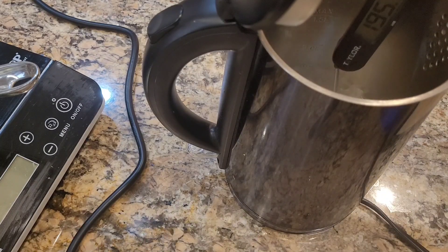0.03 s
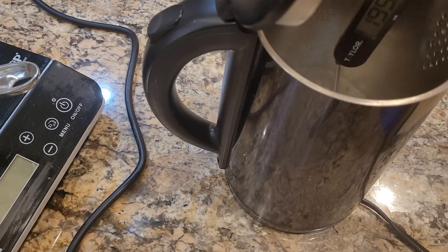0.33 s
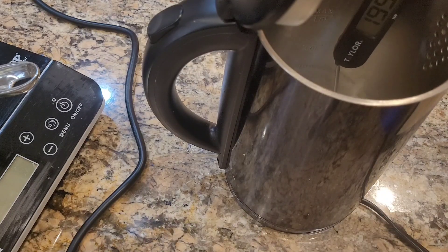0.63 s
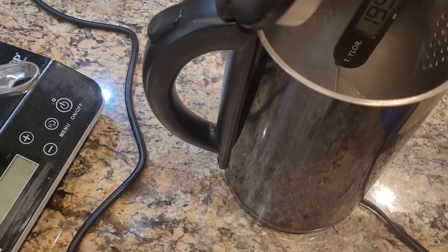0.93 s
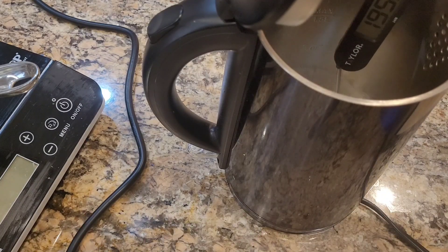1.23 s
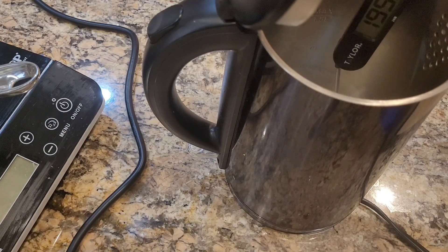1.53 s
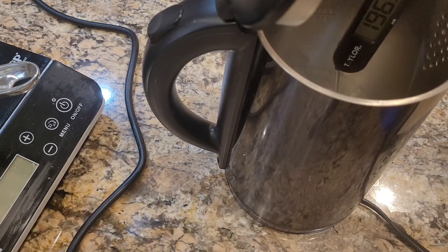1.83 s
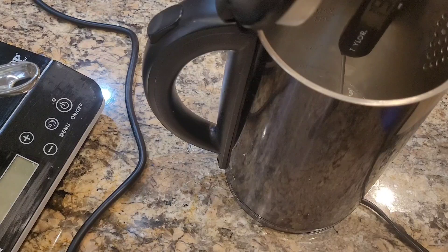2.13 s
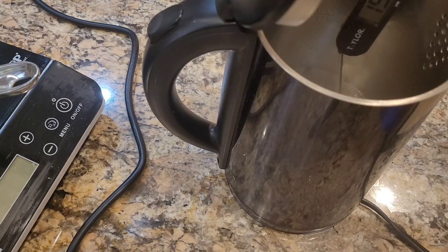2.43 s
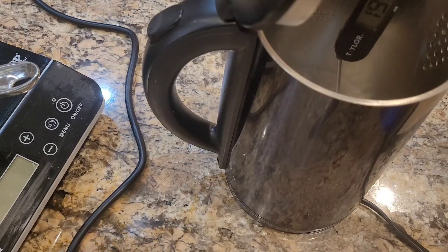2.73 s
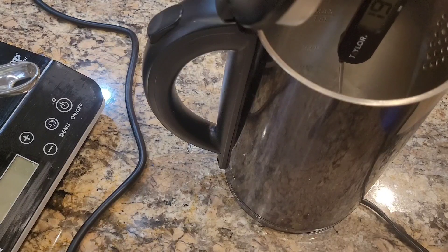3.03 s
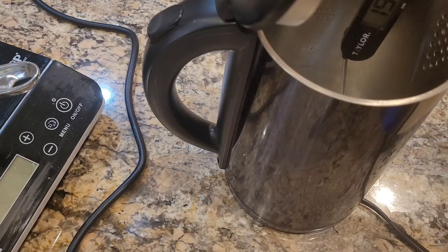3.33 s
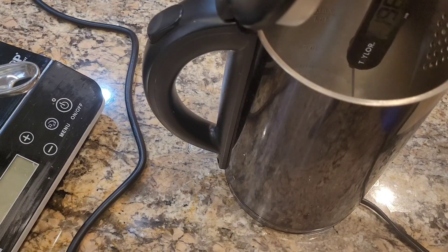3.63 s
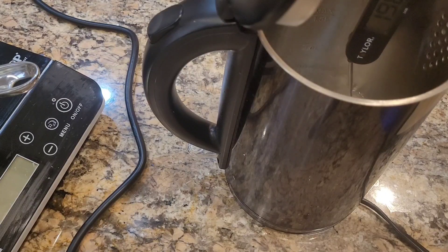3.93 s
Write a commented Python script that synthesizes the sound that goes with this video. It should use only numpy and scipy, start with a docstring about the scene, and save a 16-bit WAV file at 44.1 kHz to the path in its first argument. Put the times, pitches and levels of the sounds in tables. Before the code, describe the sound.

An electric kettle rumbles and hisses close by on a kitchen countertop, its water softly bubbling and ticking against the steel wall. A soft bump and puff of air hit the microphone early, and another puff follows later.

```python
"""A low rumble under a bright sizzle: an electric kettle on a stone countertop, shortly before the boil.
Steam bubbles collapse on the hot base; each impulse excites the modes of water and jug (the rumble)
and spits against the steel wall (the sizzle, which slowly fades as the water heats). Large bubbles
throb, tiny ones pop, and the steel pings. Twice a puff of air buffets the right microphone port,
the first time with a soft knock."""
import sys
import numpy as np
from scipy import signal
from scipy.fft import rfft, irfft
from scipy.io import wavfile

SR = 44100
rng = np.random.default_rng(int(sys.argv[2]) if len(sys.argv) > 2 else 0)


def file_out(sig):
    """Save sig as 16-bit WAV at sys.argv[1]."""
    # one column per channel
    cols = np.atleast_2d(sig).T
    # limit, then scale
    lim = np.clip(cols, -1, 1)
    pcm = np.round(lim * 32767).astype(np.int16)
    wavfile.write(sys.argv[1], SR, pcm)


N = 176400

# Large bubbles: (time [s], peak level [dB], pitch [Hz], offset of the thud in the jug [dB])
LARGE_BUBBLES = [(0.162, -41.5, 456, 1.5), (0.231, -45, 501, -4), (.303, -50, 486, -3),
                 (0.358, -39, 479, -16), (.388, -44, 473, -20), (0.452, -35, 478, -5),
                 (.558, -43, 458, 5.5), (.614, -40.5, 454, -15), (.643, -54, 483, -2),
                 (0.708, -39.5, 481, -15), (0.763, -40.5, 459, -11), (0.78, -50, 475, 9),
                 (0.876, -40.5, 469, 1), (.994, -48, 504, -8), (1.042, -40, 478, -13),
                 (1.113, -44, 456, -6), (1.184, -39.5, 439, -4), (1.241, -40, 468, -10),
                 (1.309, -48, 455, -18), (1.373, -45, 495, -5), (1.646, -39.5, 462, 1.5),
                 (1.803, -39.5, 487, 2), (1.821, -44, 459, -6), (1.905, -43.5, 505, 5),
                 (2.042, -43, 476, -3), (2.073, -44.5, 472, -4), (2.159, -38, 465, -7),
                 (2.2, -35.5, 476, -4), (2.256, -44, 467, -18), (2.345, -42, 482, -5), (2.374, -38, 476, 1),
                 (2.39, -39, 471, -4.5), (2.523, -40.5, 476, -3), (2.571, -42, 489.5, -3),
                 (2.855, -44.5, 460, -10), (2.9, -40.5, 451, -26), (2.972, -37, 476, -13),
                 (3.045, -40.5, 465, -12), (3.095, -38, 469, -24), (3.147, -34.5, 469, -10),
                 (3.226, -41, 451, -8), (3.313, -43.5, 475, -12), (3.356, -43.5, 488, -10),
                 (3.406, -42, 461, -8), (3.455, -44.5, 479, -7), (3.572, -40, 465, -10),
                 (3.647, -40.5, 474.6, -19), (3.767, -40.5, 475, -25), (3.799, -45.5, 475, -11),
                 (3.831, -44, 487, -7), (3.954, -40, 476, -3)]
# Course of the sizzle: (time [s], middle-band gain [dB], top-band gain [dB])
SIZZLE_LEVEL = [(0, 3.5, 9.5), (.4, 3.5, 4.5), (.85, 3.5, 6), (.96, 2.5, 1), (1.2, 4, 6), (1.6, 0.6, 3.5),
                (1.9, 3, 0), (2.15, 1, 1), (2.35, 2, 2.5), (2.7, 2.5, 1), (3.15, 2.2, 1.5),
                (3.65, 0.5, -3.5), (4, 0, -1)]
# Broad spectrum of the sizzle: (frequency [Hz], relative spectral density [dB])
SIZZLE_SPECTRUM = [(700, 15), (1150, 5), (1700, 11.5), (2200, -1.5), (3200, -0.5), (6200, 1), (7600, -0.5),
                   (8900, -9.5), (11000, -9.5), (13500, -3), (15800, -5)]
# Modes of the steel wall: (frequency [Hz], bandwidth [Hz], level [dB], left minus right [dB])
WALL_MODES = [(2998, 156, -75.5, -2.5), (3300, 210, -76.5, -19), (3503, 113, -77.5, -22),
              (4000, 360, -81, 0), (5000, 260, -76, 5.5), (5950, 270, -78.5, -3), (7340, 230, -85.5, 0),
              (8250, 57, -88.5, 15), (10810, 360, -79.5, 25), (11800, 1700, -75.5, -42),
              (12650, 620, -77, 18)]
SPIT_RISE_S, TICK_FALL_S, TICK_PAN_DB = 0.0021, 0.0047, -7  # the tiny pops share all three


def from_db(db):
    """Amplitude grows tenfold for every 20 dB."""
    return 10 ** (np.asarray(db) / 20)

def rms_one(x):
    """Division by the root mean square gives unit power."""
    return x / np.sqrt(np.mean(x ** 2) + 1e-20)

def in_time(rows):
    """Linear interpolation gives each column of a time curve at every sample."""
    times, *columns = np.transpose(rows)
    return [np.interp(np.arange(N) / SR, times, column) for column in columns]

def at_bins(points):
    """Interpolation over log frequency gives a curve's value at every spectral bin."""
    hz, value = np.transpose(points)
    bin_hz = np.arange(N // 2 + 1) * SR / N
    return np.interp(np.log(bin_hz + 1e-3), np.log(hz), value)

def colour(x, points):
    """Spectral weighting that conserves the power of white noise."""
    return irfft(rfft(x) * rms_one(from_db(at_bins(points))), N)

def pan(db):
    """Constant-power panning: two gains, the left exceeding the right by db."""
    sides = from_db(np.array([[.5], [-.5]]) * db)
    return sides / np.sqrt(np.mean(sides ** 2, axis=0))

def cut(x, hz, kind, order=2):
    """A maximally flat low- or high-pass filter."""
    return signal.sosfilt(signal.butter(order, hz, kind, fs=SR, output="sos"), x + 1e-18)

def drift(hz):
    """Low-passed noise: a slow random fluctuation of unit power."""
    r = np.exp(-2 * np.pi * hz / SR)
    return rms_one(signal.lfilter([1], [1, -2 * r, r * r], rng.standard_normal(N + SR))[SR:])

def resonate(x, hz, width):
    """A two-pole resonance that conserves the power of white noise."""
    r = np.exp(-np.pi * width / SR)
    feedback = [1, -2 * r * np.cos(2 * np.pi * hz / SR), r * r]
    return signal.lfilter(np.sqrt((1 - r * r) / 2) * np.array([1, 0, -1]), feedback, x + 1e-18)

def ring(train, hz, t60):
    """A damped oscillator answers each impulse with a decaying sine of that height."""
    r, w = from_db(-60 / (t60 * SR)), 2 * np.pi * hz / SR
    return signal.lfilter([0, np.sin(w)], [1, -2 * r * np.cos(w), r * r], train + 1e-18)

def clicks(rows):
    """An impulse for each (time [s], level [dB])."""
    train = np.zeros(N)
    for s, db in rows:
        train[int(s * SR)] += from_db(db)
    return train

def arrivals(per_s):
    """A Poisson process: independent events at a steady mean rate."""
    return rng.random(N) < per_s / SR

def bursts(train, rise_s, fall_s):
    """Incoherent bursts add in power; the envelope swells up to each impulse and decays after it."""
    power = signal.lfilter([1], [1, -np.exp(-2 / (fall_s * SR))], train ** 2 + 1e-18)
    keep = np.exp(-2 / (rise_s * SR))
    return np.sqrt(signal.lfilter([1 - keep], [1, -keep], power[::-1])[::-1])


def jug(train):
    """Modal superposition: water and jug ring as a sum of resonances, each rolled off an octave up."""
    # Modes of water and jug: (frequency [Hz], bandwidth [Hz], level [dB], left minus right [dB])
    modes = [(60, 23, -70.5, 5.5), (127, 33, -61.5, -2.5), (234.5, 17, -58, -1.5), (307.5, 45, -56, -7),
             (367, 64, -58, -2), (476, 30, -57.5, -10), (623, 7.7, -71.5, 7), (701.5, 104, -66.5, -11),
             (976, 46, -76, 10.5), (1205, 48, -82, 30), (1384, 106, -76, 11), (1592, 36, -75.5, -8)]
    return sum((-1) ** k * from_db(db) * pan(pan_db) * cut(resonate(train, hz, width), 2 * hz, "low")
               for k, (hz, width, db, pan_db) in enumerate(modes))

def rumble(collapses, size, cluster_db):
    """Impulse excitation: a fading stream of small collapses and the thuds of large ones ring the jug."""
    fade_db_per_s, spread_db = 0.66, 3
    fade = from_db(-fade_db_per_s * (np.arange(N) - N / 2) / SR)
    polarity = rng.choice([-1, 1], N)
    small = fade * rms_one(collapses * from_db(spread_db * size + cluster_db) * polarity)
    deep = cut(small, 610, "low", order=1)
    middle_db, _ = in_time(SIZZLE_LEVEL)
    small = deep + (small - deep) * from_db(1.27 * middle_db)  # the upper modes follow the sizzle
    unit_peak = np.abs(jug(clicks([(0, 0)]))).max()
    thuds = clicks([(s, db + thud_db) for s, db, _, thud_db in LARGE_BUBBLES])
    soft_thuds = from_db(6) * cut(thuds, 450, "low") / unit_peak
    return jug(small + soft_thuds)

def sizzle(collapses, size, cluster_db):
    """Modulated noise: each collapse spits, heard directly and through the modes of the steel wall."""
    # Direction of the sizzle: (frequency [Hz], left minus right [dB])
    balance = [(1200, -1), (2400, -4.5), (6000, -16), (9000, 13.5), (14000, -7)]
    direct_db, spread_db, hiss_share = -66, 3, 0.037
    strengths = collapses * from_db(spread_db * size + 0.42 * cluster_db)
    small = rms_one(bursts(strengths, SPIT_RISE_S, fall_s=0.0012))
    large = bursts(clicks([row[:2] for row in LARGE_BUBBLES]), rise_s=0.0061, fall_s=0.0061)
    large *= from_db(-22 - direct_db)
    envelope = np.sqrt(hiss_share + (1 - hiss_share) * small ** 2 + large ** 2)
    spray, wall_drive = envelope * rng.standard_normal((2, 2, N))
    direct = from_db(direct_db) * irfft(rfft(colour(spray, SIZZLE_SPECTRUM)) * pan(at_bins(balance)), N)
    wall = sum((-1) ** k * from_db(db) * pan(pan_db) * resonate(wall_drive, hz, width)
               for k, (hz, width, db, pan_db) in enumerate(WALL_MODES))
    whole = direct + wall + pops()
    middle_db, top_db = in_time(SIZZLE_LEVEL)  # the top fades faster than the middle
    middle = cut(whole, 8200, "low", order=1)
    return from_db(middle_db) * middle + from_db(top_db) * (whole - middle)

def pops():
    """Narrow-band noise bursts: tiny bubbles pop at random, each at one of ten pitches."""
    train = arrivals(per_s=170) * from_db(np.minimum(rng.exponential(1, N), 5))
    pitches_hz = np.geomspace(2610, 6500, 10)
    pitch_index = rng.integers(0, len(pitches_hz), N)
    noise = rng.standard_normal((2, N))
    popping = np.zeros((2, N))
    for k, hz in enumerate(pitches_hz):
        envelope = bursts(train * (pitch_index == k), SPIT_RISE_S, TICK_FALL_S)
        popping += resonate(envelope * noise, hz, width=0.15 * hz)
    return from_db(-73) * pan(TICK_PAN_DB) * rms_one(colour(popping, SIZZLE_SPECTRUM))

def kitchen(x):
    """Diffuse reverberation: a short exponential tail, independent on each side and thin in the bass."""
    t60_s, delay_s = 0.23, 0.003
    t = np.arange(SR // 2) / SR
    tail = rng.standard_normal((2, len(t))) * from_db(-60 * t / t60_s) * (t > delay_s)
    tail /= np.sqrt(np.sum(tail ** 2, axis=1, keepdims=True))
    return signal.fftconvolve(x, cut(tail, 332, "high", order=1), axes=1)[:, :N]

def background():
    """Stationary noise: a faint hush, strongest near 600 Hz."""
    # Spectrum of the hush: (frequency [Hz], relative spectral density [dB])
    spectrum = [(20, -14), (60, -49), (200, 1), (600, 16.5), (2000, -29.5), (15000, -46)]
    return from_db(-61.5) * colour(rng.standard_normal((2, N)), spectrum)

def throbs():
    """Bubble resonance: large bubbles ring briefly, sliding in pitch; weaker ones come at random."""
    rise_s, fall_s, slide_spread_hz_per_s = 0.0035, 0.017, 270
    moments = np.flatnonzero(arrivals(per_s=30)) / SR
    chance = rng.standard_normal((N // 100, 3))
    weak = [(s, -50.5 - 2.5 * softer, 478 + 15 * higher)  # (time [s], level [dB], pitch [Hz])
            for s, (softer, higher, _) in zip(moments, chance)]
    strong = [row[:3] for row in LARGE_BUBBLES]
    t = np.arange(SR // 5) / SR
    envelope = (1 - np.exp(-t / rise_s)) * np.exp(-t / fall_s)
    envelope /= envelope.max()
    ringing = np.zeros(N + len(t))
    for (s, db, hz), slide in zip(strong + weak, slide_spread_hz_per_s * chance[:, 2]):
        start = int(s * SR)
        phase = 2 * np.pi * np.cumsum(hz + slide * (t - fall_s)) / SR
        ringing[start:start + len(t)] += from_db(db) * envelope * np.sin(phase)
    return pan(-8) * ringing[:N]

def pings():
    """Free vibration: bubbles bursting on the steel set it ringing; faint ones strike it at random."""
    # Clear strikes on the wall: (time [s], peak level [dB], frequency [Hz])
    strikes = [(0.171, -61, 3000), (.182, -63, 3330), (.19, -73, 4800), (0.225, -61, 2990),
               (.235, -59, 3310), (.29, -59, 3350), (.325, -63.5, 2930), (.387, -67, 4950),
               (.565, -61, 3200), (.637, -62, 3420), (1.02, -61.5, 3630), (1.125, -67, 3480),
               (2.765, -63, 3010), (2.814, -61.5, 3030), (3.466, -62, 3180), (3.569, -60, 4920)]
    clear = sum(ring(clicks([(s, db)]), hz, t60=0.073) for s, db, hz in strikes)
    middle_db, _ = in_time(SIZZLE_LEVEL)
    faint = np.zeros((2, N))
    for hz, _, db, pan_db in WALL_MODES:
        train = arrivals(per_s=7) * from_db(middle_db)
        faint += from_db(db + 9) * pan(pan_db) * ring(train, hz, t60=0.051)
    return clear + faint

def ticks():
    """Band-limited transients: single sharp spits, each a noise burst through its own broad resonance."""
    # Sharp spits: (time [s], relative level [dB], centre frequency [Hz])
    spits = [(.386, -49, 2300), (.449, -44, 3800), (0.465, -46.5, 6500), (.492, -53, 5500),
             (0.542, -45, 1910), (.553, -47, 1700), (0.562, -46, 2600), (.637, -49, 3500),
             (.704, -62, 5500), (.794, -49.5, 4080), (.803, -52, 11500), (0.819, -48, 4000),
             (0.826, -47, 1700), (0.863, -50, 5930), (1.023, -47, 2800), (1.049, -44, 1700),
             (1.09, -50, 6100), (1.114, -51, 3750), (1.126, -46, 3570), (1.53, -49, 3580),
             (1.799, -51, 5000), (1.799, -50, 11600), (1.875, -60, 3400), (1.904, -43, 3060),
             (1.91, -47, 12600), (1.963, -52, 12200), (2.106, -51, 5900), (2.125, -47, 14000),
             (2.287, -46, 5950), (2.318, -46, 3500), (2.372, -49, 3250), (2.388, -48, 4150),
             (2.584, -46.5, 3550), (3, -47.5, 4760), (3.097, -47, 4900), (3.22, -48.5, 3300),
             (3.4, -50, 3900), (3.466, -44, 3100), (3.5, -44.5, 4650), (3.539, -51, 4870),
             (3.552, -46, 4300), (3.553, -55, 12000), (3.738, -51, 2480), (3.842, -49, 5000)]
    ticking = np.zeros((2, N))
    for s, db, hz in spits:
        envelope = bursts(clicks([(s, db)]), rise_s=0.00097, fall_s=TICK_FALL_S)
        ticking += resonate(envelope * rng.standard_normal((2, N)), hz, width=0.32 * hz)
    return from_db(-8) * pan(TICK_PAN_DB) * cut(ticking, 1170, "high")

def puffs():
    """Wind noise: moving air makes low pressure fluctuations at the right port only."""
    # Strength of the two puffs: (time [s], relative level [dB])
    strength = [(.48, -83), (.55, -46), (.6, -42.5), (.645, -28.5), (.69, -65), (.77, -66), (.81, -57),
                (.85, -45), (.93, -97), (2.69, -111), (2.76, -44), (2.9, -37.5), (2.94, -47), (2.98, -38.5),
                (3.06, -53.5), (3.14, -44.5), (3.185, -57), (3.23, -50), (3.36, -46.5), (3.44, -73)]
    # Spectrum of the buffeting: (frequency [Hz], relative spectral density [dB])
    spectrum = [(15, -1), (30, -9), (60, 3.5), (90, -8.5), (140, -8), (220, -38.5), (500, -30.5),
                (2000, -59)]
    level_db, = in_time(strength)
    return np.array([[0], [1]]) * from_db(level_db + 5.5) * colour(rng.standard_normal(N), spectrum)

def knock():
    """Damped oscillation: a soft handling knock rocks the right port for two or three slow cycles."""
    # The knock: (time [s], level [dB], frequency [Hz])
    impacts = [(0.628, -21, 66)]
    rocking = sum(ring(clicks([(s, db)]), hz, t60=0.11) for s, db, hz in impacts)
    return np.array([[0], [1]]) * cut(rocking, 302, "low")

def scene():
    """Common excitation: one stream of collapses drives both rumble and sizzle in a quiet kitchen."""
    collapses = arrivals(per_s=900)
    size = np.minimum(rng.exponential(1, N), 5)
    cluster_db = 1.86 * drift(hz=27)  # neighbouring collapses grow louder and softer together
    low = rumble(collapses, size, cluster_db) + throbs()
    high = sizzle(collapses, size, cluster_db) + ticks() + pings()
    reverberation = kitchen(from_db(-8) * low + from_db(-9.5) * high)
    return low + high + reverberation + background() + puffs() + knock()

def record(dry):
    """Band limiting: an elliptic low-pass cuts the highest treble steeply."""
    return signal.sosfilt(signal.ellip(12, .1, 70, 15850, fs=SR, output="sos"), dry)


dry = scene()
out = record(dry)
file_out(out)
```